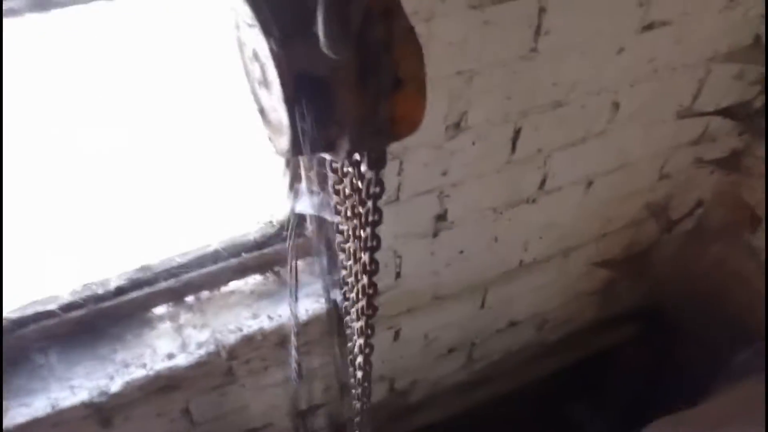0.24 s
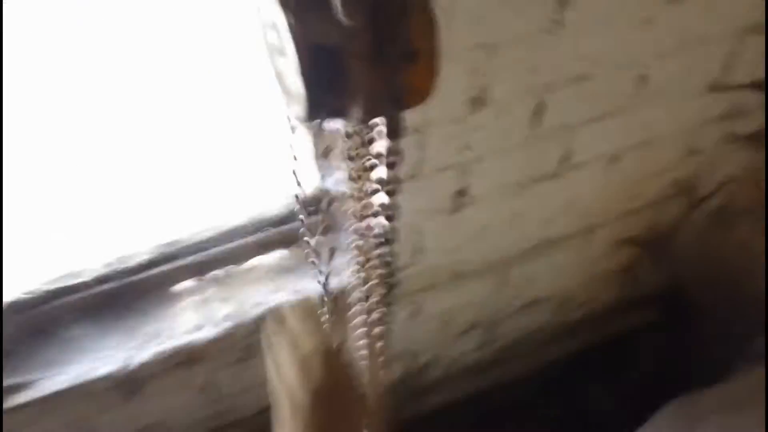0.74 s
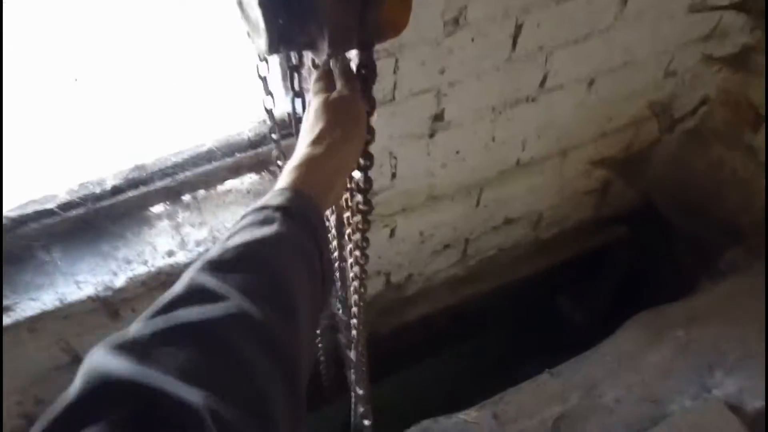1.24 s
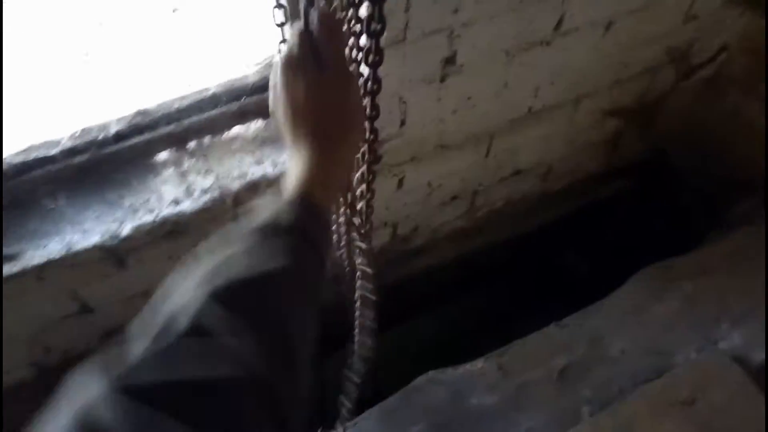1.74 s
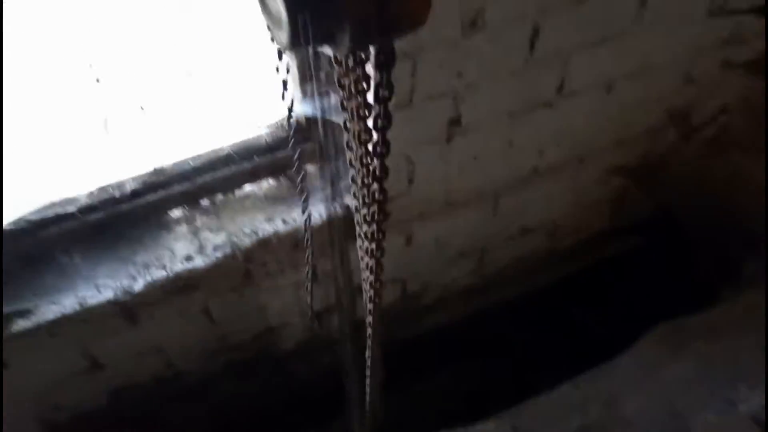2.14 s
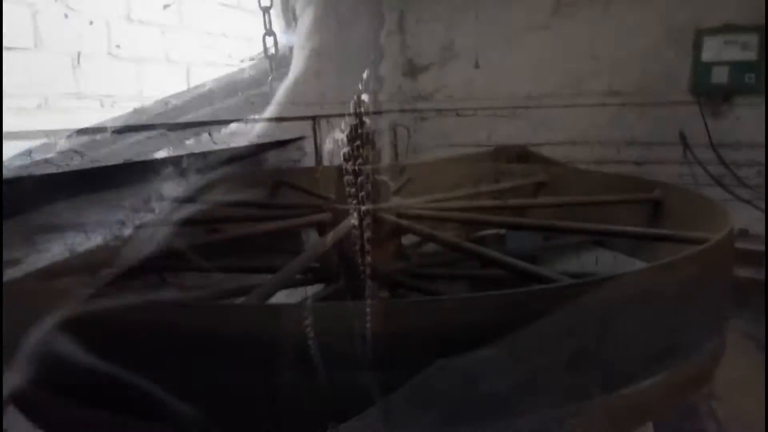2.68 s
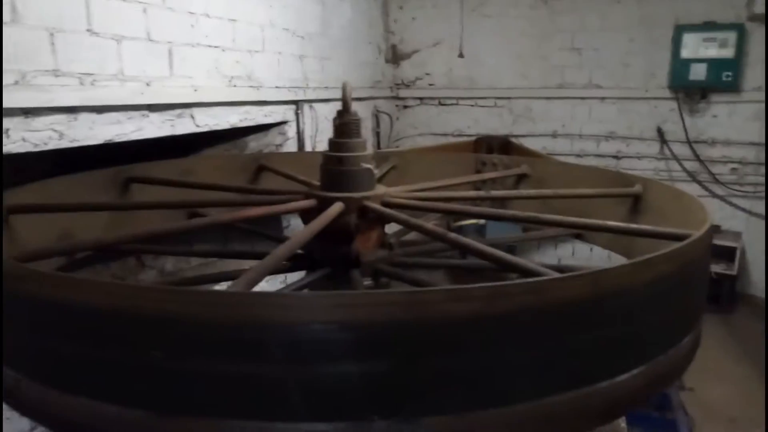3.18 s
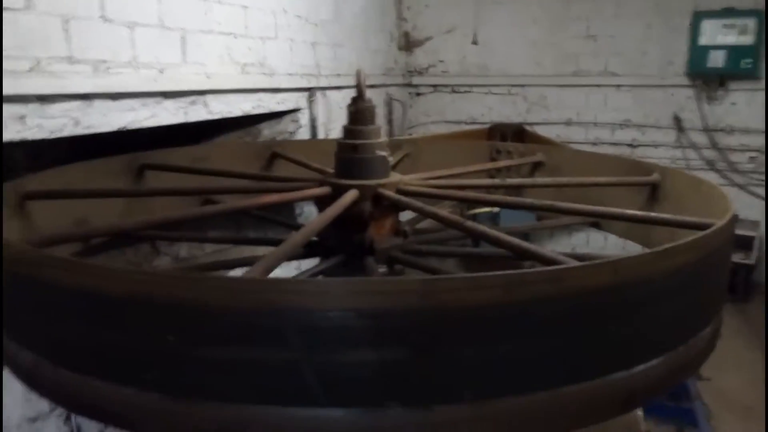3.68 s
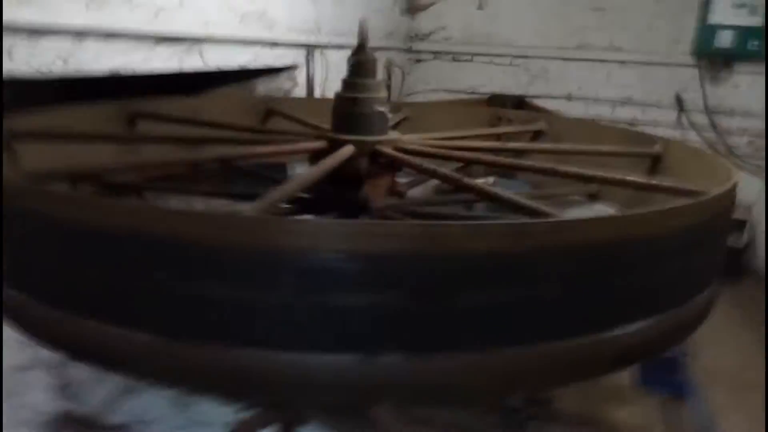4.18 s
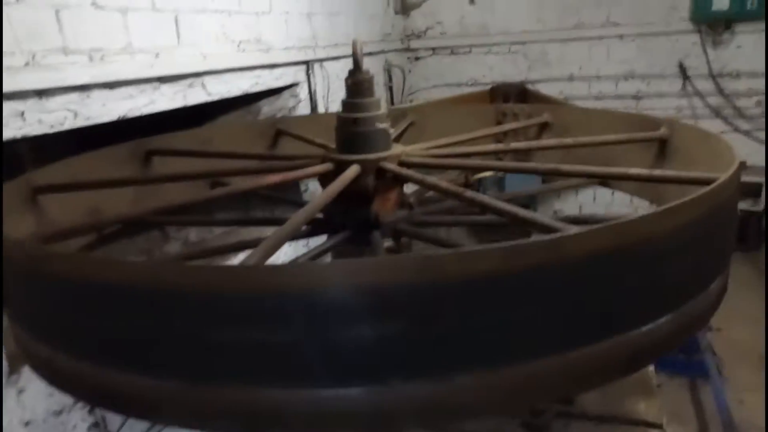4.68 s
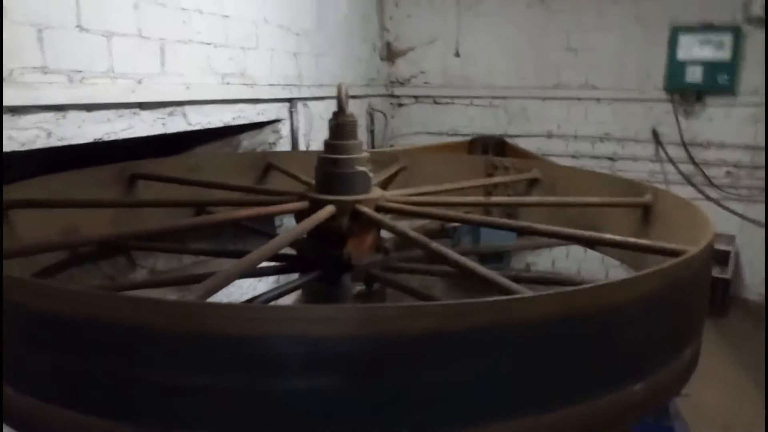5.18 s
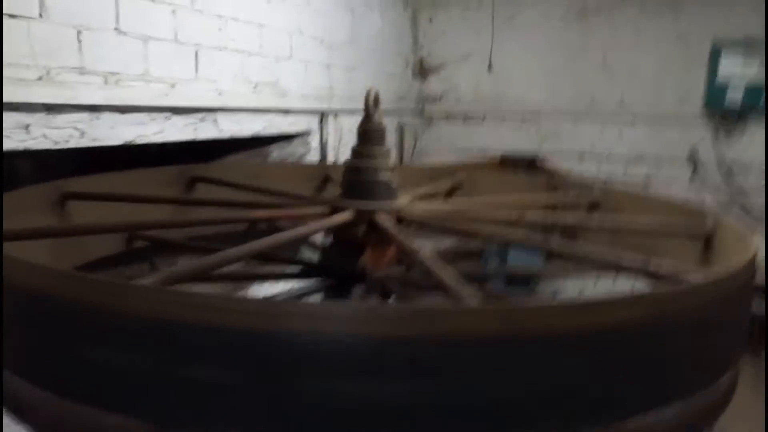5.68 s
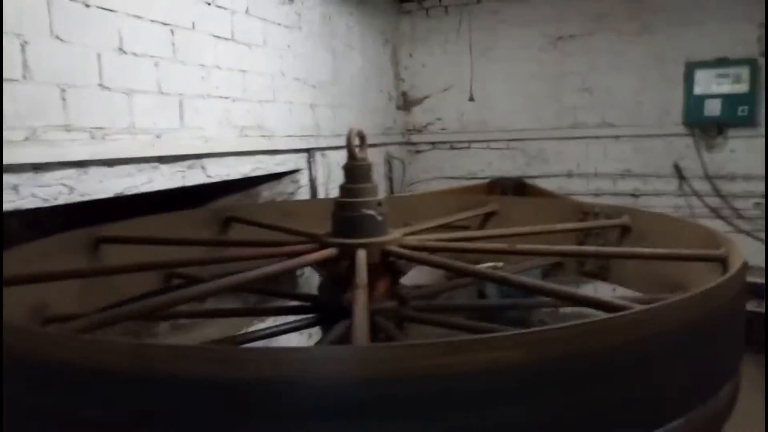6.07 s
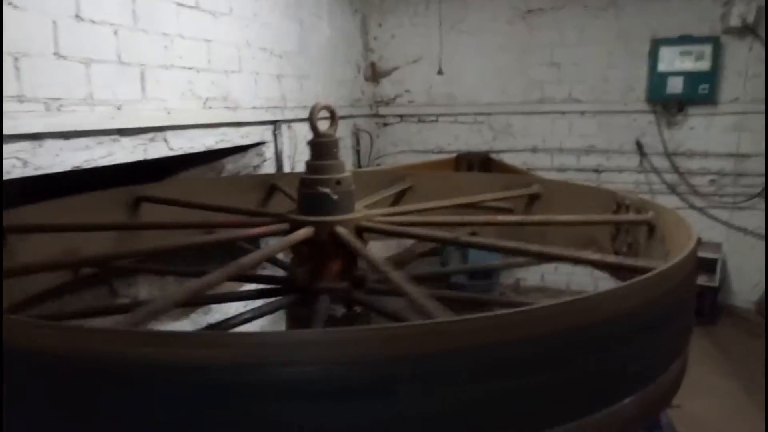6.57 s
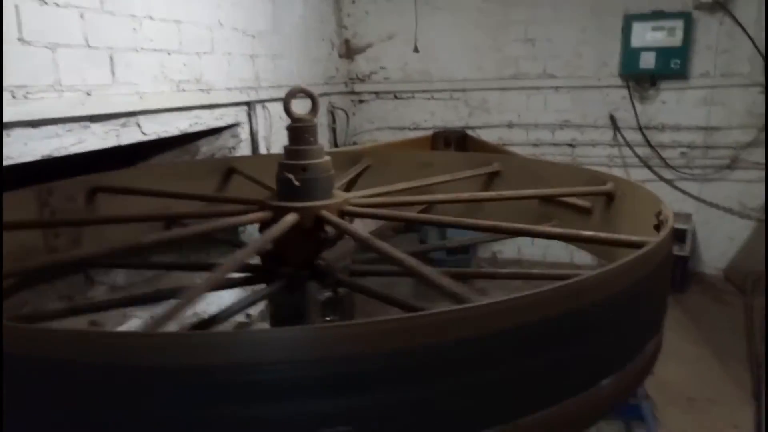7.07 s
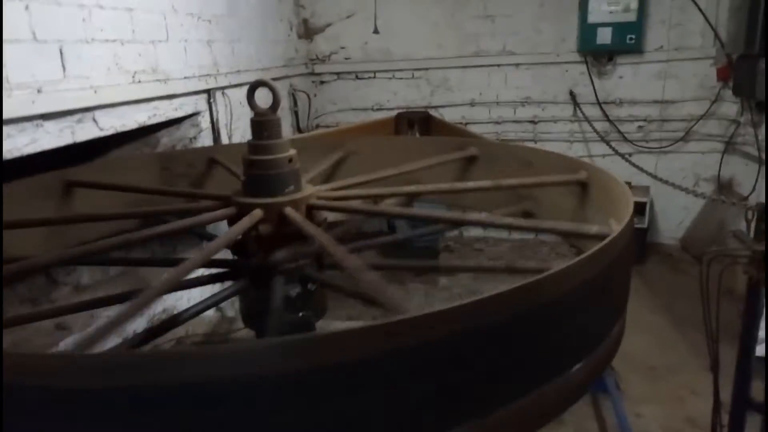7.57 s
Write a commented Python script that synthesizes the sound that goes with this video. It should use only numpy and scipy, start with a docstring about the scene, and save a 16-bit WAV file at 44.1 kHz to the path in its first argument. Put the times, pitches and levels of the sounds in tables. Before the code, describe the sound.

A metal chain rattles and clinks in bursts through a hoist, with heavy scrapes, knocks and brief wheel squeals.

```python
"""Chain hoist in a brick workshop

A hand chain is hauled over the wheel of a hoist, a few metres away. Links rattle in each pull and clink
in single blows, all ringing the same metal modes. Below them something heavier scrapes and knocks.
The wheel squeals twice and groans once on its axle, rubbed parts sing, and a soft bump comes near the
end. Hard walls ring on over a quiet hiss."""
import sys
import numpy as np
from scipy import signal
from scipy.fft import rfft, irfft, next_fast_len
from scipy.io import wavfile
from scipy.ndimage import uniform_filter1d

SR = 44100
rng = np.random.default_rng(int(sys.argv[2]) if len(sys.argv) > 2 else 0)


def output_pcm(signal):
    """Save a mono or channel-first signal as 16-bit PCM at the path in sys.argv[1].

    Samples are clipped to [-1, 1] before scaling.
    """
    pcm = np.clip(np.atleast_2d(signal).T, -1, 1) * 32767
    wavfile.write(sys.argv[1], SR, np.round(pcm).astype(np.int16))


N = 345303

# The ringing modes of the links. Each row: pitch in Hz, bandwidth in Hz, level in dB.
LINK_MODES = [(2230, 400, -18.5), (2546, 43, -4), (2658.5, 89, -1), (2888, 110, -1.5), (3120, 53, -1.5),
              (3458, 42, -9), (3504, 40, -9), (3580, 72, -5.5), (3758, 32, -12.5), (4152, 19, -6),
              (4272, 53, -1.5), (4510, 140, -8.5), (4708, 130, 2), (4916, 26, -9), (5170, 48, -3.5),
              (5576, 76, -4), (5770, 44, -2), (6060, 104, -0.5), (6227, 100, -5), (6463, 81, 4),
              (7020, 160, -3.5), (7100, 42, 0), (7690, 180, -6.5), (8880, 80, -25.5), (9720, 110, -28),
              (10170, 58, -33.5), (10840, 180, -29), (11960, 60, -29), (12400, 120, -50.5),
              (15300, 120, -52.5)]
SIDES = np.array([[1], [-1]])  # every pan is left minus right, in dB
CLOCK = np.arange(0, N / SR + .002, .001)  # envelope time in seconds, a step each millisecond


def chain():
    """Rattle and clinks ring the same links, with contact noise on top."""
    noise, rattle_at, rattle_pushes = rattle()
    clink_at, clink_pushes = clinks()
    pushes = np.concatenate([rattle_pushes, clink_pushes], axis=2)
    return noise + ring_modes(LINK_MODES, np.append(rattle_at, clink_at), pushes, rise_hz=170)


def rattle():
    """Links pile over the wheel: contact noise, and pushes on their low, high and sheen modes."""
    # The tone of link touching link. Each row: frequency in Hz, level in dB.
    contact_tone = [(880, -41), (1500, -25), (2320, -4), (2620, -7), (3290, 1), (3630, 8), (3890, 5.5),
                    (4610, -9), (5300, 0), (6270, 1.5), (8280, -7), (14900, -17.5), (16100, -83)]
    low_db, high_db, sheen_db, contact_db, pan_db, low_hz, high_hz, sheen_hz = hauling()
    at, size = contacts(rate=550, scatter_db=3.0)
    level = undb(low_db + SIDES * pan_db / 2)
    grains = crackle(at, size, smear_s=.005)
    noise, pushes = 0, []
    edges_hz, noise_trims_db = (1500, 5300, 7800, 16200), (-10, -14, -9)
    for lo, hi, band_db, trim_db in zip(edges_hz, edges_hz[1:], (0, high_db, sheen_db), noise_trims_db):
        inside = [point for point in contact_tone if lo < point[0] < hi]
        band = [(lo, over_hz(contact_tone, lo)), *inside, (hi, over_hz(contact_tone, hi))]
        band_noise = colour(grains, [(lo * 0.25, -60), *band, (hi * 1.05, -60)])
        noise = noise + undb(trim_db + band_db + contact_db) * level * band_noise
        modes = [mode for mode in LINK_MODES if lo <= mode[0] < hi]
        favour = .45 + nearness(modes, low_hz[at], octaves=.09)
        favour += 1.3 * nearness(modes, high_hz[at], octaves=.06)
        favour += 0.57 * nearness(modes, sheen_hz[at], octaves=.05)
        # other links pass over the wheel, so modes come and go
        favour *= undb(2.56 * drift(count=len(modes), rate=7)(at))
        pushes.append(undb(-4.5) * shaken(modes, at, size * (level * undb(band_db))[:, at], favour))
    return noise, at, np.concatenate(pushes)


def hauling():
    """Pulls and jolts shake the chain: they set the rattle's levels, pan and favoured pitches."""
    # Pulls on the chain. Each row: start, arrival at full rattle, rise, hold and fall in seconds;
    # low ring level, swell during the hold, high ring above low, sheen above high, contact noise
    # and pan in dB; favoured pitches in Hz of the low ring (first, last), high ring and sheen.
    pulls = [(0.185, 0.297, 0.16, 0.42, 0.33, -24, 10.5, -3, -16.5, -4, 5.5, 3400, 4170, 6290, 11000),
             (1.971, 2.1, .14, 0.32, 0.22, -16, -1.5, 3, -15, 0, 1.5, 3840, 4400, 6200, 11100),
             (3.976, 4.059, .13, 0.15, 0.089, -19.5, 5.5, 1.5, -20.5, 1.5, -4.5, 4460, 3140, 6120, 8860),
             (5.592, 5.682, 0.14, 0.34, 0.15, -15.5, 4, 1.5, -19.5, 1, -5, 4000, 3900, 6190, 9840),
             (7.53, 7.59, 0.11, 0.063, .15, -48, -4.5, 5, -20, 5.5, -7, 4900, 4900, 5640, 9750)]
    # Brief jolts. Each row: time and fall in seconds; low ring level, high ring above low and
    # pan in dB; favoured low and high pitch in Hz.
    jolts = [(0.051, 0.023, -16.5, -30, 9.5, 2950, 6440), (0.06, 0.016, -22.5, 10.5, 26.5, 2800, 6290),
             (.49, 0.081, -11, -5, -5, 3640, 6450), (.584, 0.15, -9.5, -22, -7, 3940, 6330),
             (0.763, 0.1, -13.5, -33, -5, 2580, 6310), (0.996, 0.11, -19.5, -13, 0, 2720, 5830),
             (2.612, 0.076, -27.5, -2, -5, 3140, 6400), (2.652, .085, -28, -25, 0, 2840, 6160),
             (3.085, 0.17, -38.5, -8, -5, 3480, 5940), (3.158, 0.3, -23, -20, -1.5, 2720, 5980),
             (3.235, 0.034, -20, -21, -8, 2970, 7050), (3.256, 0.12, -42.5, 10.5, -2, 2840, 7100),
             (3.986, 0.2, -24, 2.5, -6.5, 4700, 6150), (4.35, 0.14, -38, -9, -6, 3020, 6000),
             (6.124, 0.21, -21, -24, -4.5, 2630, 5820), (6.212, 0.12, -16.5, -28, -4.5, 2780, 5870)]
    jolt_rise_s, jolt_sheen_db, jolt_sheen_hz = 0.0069, -18.5, 8860
    short_pulls = [(s - jolt_rise_s, s, jolt_rise_s, .001, fall, db, 0, high, jolt_sheen_db, 0, pan,
                    hz, hz, top, jolt_sheen_hz) for s, fall, db, high, pan, hz, top in jolts]
    (start, full, rise, hold, fall, db, swell, high, sheen, contact, pan,
     first_hz, last_hz, high_hz, sheen_hz) = np.transpose(pulls + short_pulls)[:, :, None]
    down_db = under_peak(full, rise, hold, fall)
    progress = np.clip((CLOCK - full) / hold, 0, 1)
    still = (CLOCK < start) | (CLOCK > full) & (down_db > 24.5)  # the chain hangs still
    peak_db = db + swell * progress ** 0.31 - 100 * still  # a pull swells quickly at first
    glide_hz = first_hz + (last_hz - first_hz) * progress
    low_db, contact_db, pan_db, low_hz = blend(peak_db - down_db, contact, pan, glide_hz)
    # the high ring rises and falls less steeply than the low
    high_db, sheen, high_hz, sheen_hz = blend(peak_db + high - 0.58 * down_db, sheen, high_hz, sheen_hz)
    above_low_db = high_db - low_db
    return low_db, above_low_db, above_low_db + sheen, contact_db, pan_db, low_hz, high_hz, sheen_hz


def clinks():
    """Link strikes link, favouring a low, a middle and a high ring, then rebounds twice, weaker."""
    # Single blows. Each row: time in seconds, level in dB, low ring weight in dB, middle ring pitch
    # in Hz and weight in dB, high ring pitch in Hz and weight in dB, pan in dB.
    blows = [(.0513, -10.5, -12, 2910, 14, 6050, -21, -18), (.0634, -3.5, -9, 4530, -11, 6060, -26, -4),
             (.1979, -27, -17, 4720, -16, 6520, -16, 6), (.2278, -24, -27, 4300, -11, 6480, 5, 4),
             (.2686, -13.5, -9, 4300, -18.5, 6380, -3, 6), (.5733, 4, -16, 4530, -8, 6100, -15, 3),
             (1.2482, -7.5, 0.5, 3690, -4.5, 6120, -38, -3),
             (1.9842, -14.5, -34.5, 5000, -23, 6440, 2, 9.5), (2.0115, -11.5, -28, 4880, -4, 6430, 12, 6),
             (2.3704, -12, -40, 3500, -6, 6060, -16, -3), (2.5591, -14, -18, 3550, -13, 6220, -3, -4),
             (2.6006, -18, -19, 4630, -8, 6050, -7, -21.5), (2.6365, -11, 5, 3680, -1, 6200, -20, -1),
             (2.7432, -16, -16, 4710, -11, 6080, -7.5, -3), (3.258, -7, -28, 3750, -26, 6860, 12, -10.5),
             (3.3083, -13.5, -28, 5270, -3, 7000, 5, -2), (3.7908, -14, -29, 4680, -11.5, 5990, -8, -15.5),
             (3.9846, -11.5, -29, 4730, -1, 6100, -9, -21), (4.018, -10.5, -17, 4710, -16, 6000, 0, -13),
             (4.0361, -5, -17, 4720, -12, 6200, -4, -9), (4.061, -1, -21, 4680, -8, 6220, -12, -11),
             (4.0976, -7, -24, 4700, -14, 5960, -5, -14), (4.1637, -4.5, -21.5, 4660, -16, 5930, -18, -13),
             (4.2041, -1, -11, 3780, -14, 5980, 0.5, -13.5), (4.428, -15, -22, 4350, -32, 6040, -8.5, -13),
             (4.4641, -17.5, -17.5, 4420, -38, 6320, -11.5, -16),
             (4.801, -15, -44, 3000, -23, 6060, -2, -19), (4.898, -34, -11, 3650, -3, 5780, -13, -9.5),
             (5.048, -24.5, -46, 3913, 2.5, 6660, -35, -9), (5.228, -25, -21, 4800, -14, 6060, -10, -17),
             (5.2544, -40, -20, 4900, -5, 5760, -19, -10), (5.3583, -28, -16, 3560, -19, 6960, -23, -21),
             (5.3705, -22.5, -5, 3530, -4, 5810, -20, -11), (5.575, -27, -6, 3500, -13, 5700, -13, -8.5),
             (5.601, -18, -13, 4300, -8, 6330, 5, -19), (5.6659, -6, -8, 4730, -3, 6260, -4, -20),
             (5.7402, -5.5, -19, 5050, -13, 6800, -15, -12.5), (6.123, -8.5, -5, 3890, -19, 6230, -13, -3)]
    s, level_db, low_db, mid_hz, mid_db, high_hz, high_db, pan_db = np.transpose(blows)
    low_hz = 2659  # every blow favours the same low ring, near 2.66 kHz
    weight = 0.049 * undb(np.array(LINK_MODES)[:, 2:])
    for hz, db in ((low_hz, low_db), (mid_hz, mid_db), (high_hz, high_db)):
        weight = weight + undb(db) * nearness(LINK_MODES, hz, octaves=0.048)
    jitter = rng.random((len(s), 2)).T
    times = [s, s + .002 + .004 * jitter[0], s + .009 + 0.02 * jitter[1]]
    pushes = [struck(LINK_MODES, level_db + db, pan_db, weight) for db in (-1.5, -8, -11)]
    return (np.concatenate(times) * SR).astype(int), np.concatenate(pushes, axis=2)


def scrape():
    """A heavy part sticks and slips: gritty noise and a ringing body, which knocks also strike."""
    # The modes of the heavy part. Each row: pitch in Hz, bandwidth in Hz, level in dB.
    body = [(101.6, 21, -12.5), (243, 46, -17.5), (360, 58, -10.5), (462.7, 5.3, -3.5), (561, 80, -8.5),
            (619, 33.5, -1), (705.6, 46, -5), (815.6, 52, 4), (915, 40, -1), (1012, 26, 5), (1154, 25, 2),
            (1287, 52, 1), (1360, 43, 10.5), (1420, 7.2, 0.5), (1596, 58, 5.5), (1728, 18, 1.5),
            (1982, 46, 0), (2337, 60, 2.5)]
    # The tone of the grit. Each row: frequency in Hz, level in dB.
    grit_tone = [(15, -58.5), (25, -36.5), (150, -23), (334, -11), (728, -7), (816, 0.5), (894, -2.5),
                 (1030, 0), (2290, -3.5), (3160, -17), (6000, -33), (7800, -55.5), (13200, -120)]
    # Dull knocks. Each row: time in seconds, level in dB, favoured pitch in Hz, pan in dB.
    knocks = [(0.062, -16, 1290, -3), (0.399, -18, 1280, 8), (0.562, -6, 1855, 2), (0.716, -6.5, 690, -8),
              (0.884, 0.5, 950, -8), (0.996, -1.5, 1970, 12), (2.142, -31.5, 1310, -9),
              (2.453, -13, 1970, -1), (3.158, -15, 890, -11), (3.237, -10, 890, 4),
              (3.437, -24.5, 1546, 13), (4.209, -15, 1430, 7), (4.463, -27, 1355, 2),
              (4.899, -32, 1940, -7), (5.74, -17, 627, 17), (6.12, -23, 1310, -5), (6.206, -11, 1600, 5)]
    bottom_hz, pan_db = 750, -1
    body_db, bottom_db, favour_hz, grit_db = scrape_strokes()
    at, size = contacts(rate=500, scatter_db=3.0)
    level = undb(body_db - 5.5 + SIDES * pan_db / 2)
    grit = colour(crackle(at, size, smear_s=0.008), grit_tone, 830, 2250)
    bottom = signal.sosfilt(signal.butter(4, bottom_hz, fs=SR, output="sos"), grit)
    grit = undb(grit_db) * level * (grit - bottom + undb(bottom_db) / np.std(bottom) * bottom)
    split = sum(mode[0] < bottom_hz for mode in body)
    favour = 0.42 + nearness(body, favour_hz[at], octaves=0.28)
    low = shaken(body[:split], at, size * (level * undb(bottom_db))[:, at], favour[:split])
    high = shaken(body[split:], at, size * level[:, at], favour[split:])
    knock_s, knock_db, knock_hz, knock_pan_db = np.transpose(knocks)
    weight = 0.091 * undb(np.array(body)[:, 2:]) + nearness(body, knock_hz, octaves=0.1)
    blows = struck(body, knock_db - 4.5, knock_pan_db, weight)
    pushes = np.concatenate([np.concatenate([low, high]), blows], axis=2)
    ringing = ring_modes(body, np.append(at, (knock_s * SR).astype(int)), pushes, rise_hz=122)
    return narrow_bass(grit + ringing)


def scrape_strokes():
    """Level and colour of the scrape: after its peak each stroke settles to a dull, bottomy ring."""
    # Each row: peak time, rise, hold and fall in seconds, body level in dB, bottom above body in dB,
    # favoured pitch in Hz, grit above the ring in dB.
    strokes = [(0.1, 0.5, .01, 0.28, -31.5, 4, 595, -1), (.4, 0.13, .15, .05, -33, -7.5, 1550, -2),
               (0.573, 0.047, .01, 0.22, -18.5, -8, 1490, 4), (0.724, 0.047, 0.012, 0.32, -6, -5, 980, 2.5),
               (0.89, 0.046, .01, 0.22, -18, 3.5, 930, 9), (0.94, 0.13, 0.0088, 0.19, -15, -13, 820, -21.5),
               (0.996, 0.016, 0.0071, 0.13, -8.5, -3, 1400, 5),
               (1.347, 0.35, 0.0084, 0.06, -36.5, -7, 1410, -5),
               (2.155, 0.11, 0.036, 0.28, -18.5, -6.5, 1560, 4.5),
               (2.479, 0.057, .01, 0.29, -28.5, -6, 1850, 7),
               (2.685, 0.24, 0.017, 0.36, -39.5, -21, 950, 6), (2.844, 0.13, .24, 0.12, -40, -0.5, 990, 3),
               (3.16, 0.017, 0.01, 0.15, -21, -10.5, 1500, 7), (3.123, .06, .01, .04, -28.5, -10, 1100, -5),
               (3.247, 0.12, .01, 0.19, -23, -5.5, 890, -7.5),
               (3.436, 0.024, .02, 0.13, -25.5, -26, 1500, -9),
               (4.144, 0.14, .01, 0.21, -37, 2, 1220, -10.5),
               (4.212, 0.084, 0.067, 0.13, -28.5, -5, 1430, -7),
               (4.476, 0.11, 0.0088, 0.1, -41, 0.5, 1100, -5),
               (5.771, 0.22, 0.013, 0.31, -21, -1.5, 603, -7),
               (5.973, 0.34, .01, 0.48, -28, -3.5, 650, 1.5), (6.128, .15, .01, 0.2, -30, -14.5, 1370, 0.5),
               (6.208, .012, 0.035, 0.16, -18.5, -9.5, 1480, 1.5)]
    settle_hz, settle_s, settle_bottom_db = 690, 0.11, 6
    s, rise, hold, fall, db, bottom_db, hz, grit_db = np.transpose(strokes)[:, :, None]
    fresh = np.exp(-np.maximum(CLOCK - s - hold, 0) / settle_s)
    return blend(db - under_peak(s, rise, hold, fall), bottom_db + settle_bottom_db * (1 - fresh),
                 settle_hz + (hz - settle_hz) * fresh, grit_db)


def wheel_squeals():
    """The wheel rubs on its axle: gliding friction tones that flutter in strength and pitch."""
    # A squeal, a low groan and a second squeal. Each point: time in seconds, pitch in Hz, level in dB.
    glides = [
        [(2.08, 3992, -32), (2.128, 4090, -20.5), (2.2, 4080, -20), (2.262, 4350, -32), (2.275, 4514, -19),
         (2.302, 4536, -12.5), (2.324, 4453, -25), (2.372, 4506, -13.5), (2.486, 4675, -25.5),
         (2.52, 4490, -49)],
        [(3.235, 900, -36), (3.26, 852.6, -29.5), (3.31, 718, -31), (3.36, 630, -43)],
        [(5.855, 5830, -28), (5.869, 5620, -10.5), (5.973, 5840, -15), (5.995, 6110, -13), (6.055, 6050, -32)],
    ]
    pan_db = -6.5
    gate, (hz, db) = over_time(glides)
    flutter = drift(count=2, rate=90)(np.arange(N))
    phase = 2 * np.pi * np.cumsum(hz) / SR + 0.86 * flutter[::-1]
    return gate * undb(db + 2.2 * flutter + SIDES * pan_db / 2) * np.sin(phase)


def singing_parts():
    """Rubbing keeps single parts singing, each on one wavering note."""
    # Each row: start and end in seconds, pitch in Hz, opening level in dB, pan in dB.
    notes = [(1.128, 1.215, 251.6, -36.5, -3), (3.29, 3.407, 5560, -42.5, -13),
             (4.21, 4.384, 1443, -37.5, 9), (4.302, 4.6, 2640, -43, -10), (5.697, 5.812, 559, -27.5, -4.5),
             (5.893, 6.02, 235.5, -31, 0.5), (5.969, 6.194, 15400, -36, 2),
             (6.276, 6.417, 4200, -42.5, -11), (6.363, 6.446, 4790, -44, 3),
             (7.555, 7.698, 1964, -53.5, -15), (7.567, 7.71, 3400, -47.5, -14),
             (7.597, 7.716, 4180, -52.5, -11)]
    t = np.arange(N) / SR
    out = np.zeros((2, N))
    for start, end, hz, db, pan_db in notes:
        gate = np.clip(np.minimum(t - start, end - t) / 0.0067, 0, 1)
        fade = undb(-50 * np.clip(t - start, 0, 1))  # the rubbing eases
        wander = drift(count=2, rate=65)(np.arange(N))
        level = undb(db + 2.8 * wander[0] + SIDES * pan_db / 2)
        out += gate * fade * level * np.sin(2 * np.pi * hz * t + 1.43 * wander)
    return out


def thump():
    """A low, soft bump close by that sags in pitch."""
    # In order: start in seconds, level in dB, opening pitch in Hz, seconds to fall 60 dB.
    bump = (7.508, -34, 100, .26)
    start, db, hz, t60 = bump
    t = np.maximum(np.arange(N) / SR - start, 0)
    envelope = undb(db - 60 * t / t60) * (1 - np.exp(-t / 0.0041))
    return envelope * np.sin(2 * np.pi * hz * t * (1 - 1.9 * t))


def hiss():
    # The tone of the hiss. Each row: frequency in Hz, level in dB.
    tone = [(15, -28.5), (58, -16), (100, -7.5), (165, -8.5), (270, -1), (380, -4), (470, -1), (650, -4),
            (1400, -6), (3000, -13), (5500, -13.5), (7000, -20), (8000, -35.5), (12000, -39.5),
            (15600, -48), (16200, -84.5)]
    # Its lean to one side. Each row: frequency in Hz, pan in dB.
    lean = [(60, 3), (200, 0.5), (700, 0.5), (2400, -1.5), (6000, -5), (15000, 9)]
    # Its level ride. Each row: time in seconds, level in dB, the coder's treble lift in dB.
    ride = [(0, -40, 1), (1.2, -45, 3), (1.5, -43.5, 10.5), (1.95, -44, 11), (2.7, -44.5, 1),
            (3.0, -43.5, 0.5), (3.7, -40, -1.5), (4.6, -43, 0.5), (5.5, -43.5, 0), (6.5, -43.5, 0),
            (7.0, -43.5, -3), (7.7, -45, -4), (7.83, -51.5, -2)]
    _, (db, treble_db) = over_time([ride])
    noise = colour(narrow_bass(rng.standard_normal((2, N))), tone, 150, 7500)
    hz, t, spectra = signal.stft(noise, SR, nperseg=1024)
    quarter_octave = (4 * np.log2(1 + hz / 10)).astype(int)
    waver_db = 1.6 * drift(count=48, rate=12)(t * SR)[quarter_octave]
    shelf = over_hz([(1493, 0), (9000, 1)], hz)[:, None]
    lift_db = shelf * np.interp(t * SR, np.arange(N), treble_db)
    side_db = (SIDES * over_hz(lean, hz) / 2)[..., None]
    spectra *= undb(waver_db + lift_db + side_db)
    return undb(db - 2.0) * signal.istft(spectra, SR, nperseg=1024)[1][:, :N]


def brick_room(x):
    """Brick walls return a dense tail on each side, longest in the bass."""
    # Each row: frequency in Hz, seconds to fall 60 dB.
    decay_times = [(100, 0.59), (1000, 0.14), (5000, 0.28), (12000, 0.085)]
    noise = narrow_bass(rng.standard_normal((2, N)))[:, :SR]
    hz, t, spectra = signal.stft(noise, SR, nperseg=256)
    decay = undb(-60 * t / over_hz(decay_times, hz)[:, None])
    tail = signal.istft(spectra * decay, SR, nperseg=256)[1]
    tail *= np.clip(np.arange(tail.shape[1]) / (0.0049 * SR), 0, 1)  # echoes build up
    tail /= np.sqrt(np.sum(tail ** 2, axis=1, keepdims=True))
    return signal.fftconvolve(x, tail, axes=1)[:, :N]


def narrow_bass(x):
    """Two close microphones hear the bass alike and the treble apart."""
    # Each row: frequency in Hz, correlation of left and right.
    likeness = [(60, 0.87), (130, 0.84), (290, 0.94), (640, 0.56), (1400, 0.024), (16000, 0.13)]
    size = next_fast_len(N)
    correlation = np.clip(over_hz(likeness, np.fft.rfftfreq(size, 1 / SR)), 0, .99)
    mid, side = np.sqrt(1 + correlation), np.sqrt(1 - correlation)
    spectra = rfft(x, size)
    return irfft(((mid + side) * spectra + (mid - side) * spectra[::-1]) / 2, size)[:, :N]


def contacts(rate, scatter_db):
    """Random moments and sizes of about rate small impacts a second, many weak and few strong."""
    at = np.unique(rng.integers(0, N, int(rate * N / SR)))
    size = undb(scatter_db * np.minimum(rng.exponential(size=len(at)), 4))
    return at, size / np.sqrt(np.sum(size ** 2) / N)


def crackle(at, size, smear_s):
    """Each impact is a short burst of noise."""
    power = np.zeros(N)
    power[at] = size ** 2
    pole = np.exp(-1 / (smear_s * SR))
    return np.sqrt(signal.lfilter([1 - pole], [1, -pole], power)) * rng.standard_normal((2, N))


def shaken(modes, at, drive, favour):
    """Pushes (modes, sides, impacts) of a shower of impacts, each reaching every mode differently."""
    hz, width, db = np.transpose(modes)[:, :, None]
    power = undb(db) ** 2 * width * favour ** 2
    share = power / power.sum(axis=0) * 4 * np.pi * width / SR
    return np.sqrt(share)[:, None] * drive * rng.standard_normal((len(modes), 2, len(at)))


def struck(modes, level_db, pan_db, weight):
    """Pushes (modes, sides, blows) of single blows, shared among the modes by weight and chance."""
    chance = rng.standard_normal((len(level_db), 2, len(modes))).T
    weight = weight * np.sign(chance[:, 0]) * undb(2.0 * chance[:, 1])
    weight = weight / np.sqrt(np.sum(weight ** 2, axis=0))
    return weight[:, None] * undb(level_db + SIDES * pan_db / 2)


def ring_modes(modes, at, pushes, rise_hz):
    """Each push makes a mode swell in about 1 / (pi rise_hz) seconds, then ring away."""
    out = np.zeros((2, N))
    for (hz, width, _), (left, right) in zip(modes, pushes):
        late = at + int(round(SR / hz / 4))  # the right side hears it a quarter cycle later
        push = np.array([np.bincount(at, left, N), np.bincount(late, right, N)[:N]])
        poles = np.exp((2j * np.pi * hz - np.pi * np.array([width, rise_hz])) / SR)
        gains = poles.imag * [1, 2 * (1 - abs(poles[1]))]
        sections = [[g, 0, 0, 1, -2 * p.real, abs(p) ** 2] for g, p in zip(gains, poles)]
        out += signal.sosfilt(sections, push)
    return out


def nearness(modes, favour_hz, octaves):
    """Modes close to a favoured pitch ring most."""
    return np.exp(-(np.log2(np.array(modes)[:, :1] / favour_hz) / octaves) ** 2)


def drift(count, rate):
    """Wandering curves, one a row, that head for a new random value rate times a second."""
    knots = rng.standard_normal((count, int(rate * N / SR) + 2))
    return lambda at: np.array([1.2 * np.interp(at / SR * rate, np.arange(len(k)), k) for k in knots])


def under_peak(s, rise, hold, fall):
    """Decibels under each event's peak at s: 30 dB up over rise, flat for hold, 30 dB down over fall."""
    return 30 * (np.maximum(s - CLOCK, 0) / rise + np.maximum(CLOCK - s - hold, 0) / fall)


def blend(db, *settings):
    """Summed level of overlapping events and their power-weighted settings, sample by sample."""
    power = undb(db) ** 2 + 1e-16
    total = power.sum(axis=0)
    curves = [10 * np.log10(total)] + [(power * setting).sum(axis=0) / total for setting in settings]
    return [np.interp(np.arange(N) / SR, CLOCK, curve) for curve in curves]


def colour(x, tone, lo_hz=0, hi_hz=SR):
    """Equalise by a (Hz, dB) curve, scaled so the band from lo_hz to hi_hz passes as much power as a flat gain
    of 1 over the whole spectrum."""
    size = next_fast_len(x.shape[-1])
    hz = np.fft.rfftfreq(size, 1 / SR)
    gain = undb(over_hz(tone, hz))
    gain /= np.sqrt(np.sum(gain[(hz >= lo_hz) & (hz < hi_hz)] ** 2) / len(hz))
    return irfft(rfft(x, size) * gain, size)[..., :x.shape[-1]]


def over_time(curves):
    """A soft gate, open during each curve, and the curves' columns sample by sample."""
    t = np.arange(N) / SR
    rows = np.concatenate(curves)
    gate = sum((t >= curve[0][0]) & (t < curve[-1][0]) for curve in curves)
    return uniform_filter1d(1. * gate, size=200), [np.interp(t, rows[:, 0], c) for c in rows.T[1:]]


def over_hz(curve, hz):
    """Read a (Hz, value) curve along a log frequency axis."""
    points_hz, values = np.transpose(curve)
    return np.interp(np.log(np.maximum(hz, 1)), np.log(points_hz), values)


def undb(db):
    """Decibels to amplitude."""
    return 10 ** (np.asarray(db) / 20)


def scene():
    """The hoist and its echo off the walls, with the hiss and the bump added dry."""
    hoist = chain() + scrape() + wheel_squeals() + singing_parts()
    return hoist + undb(-7.5) * brick_room(hoist) + hiss() + thump()


def record(dry):
    """The loudest peaks are clipped and the very top is cut."""
    top_cut = signal.ellip(8, .2, 70, 16274, fs=SR, output="sos")
    return signal.sosfilt(top_cut, np.clip(dry, -1, 1))


dry = scene()
out = record(dry)
output_pcm(out)
```